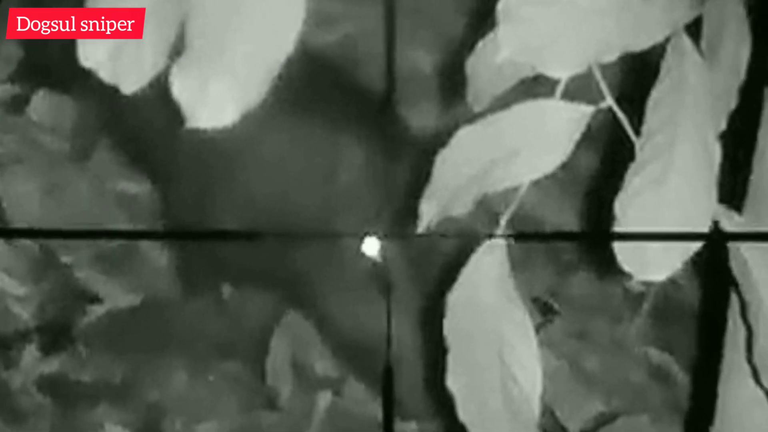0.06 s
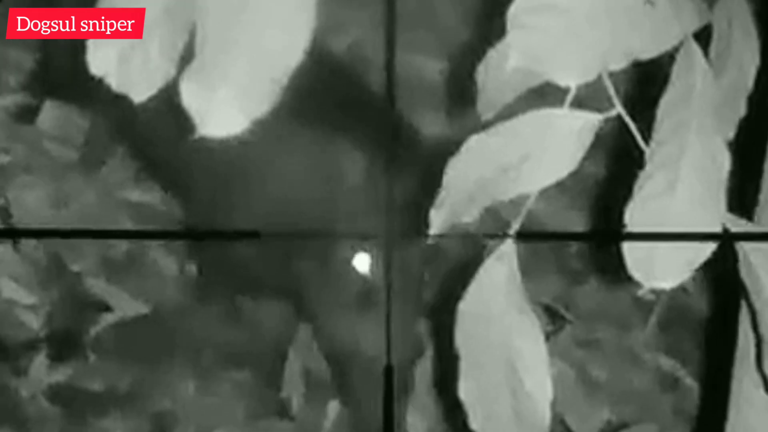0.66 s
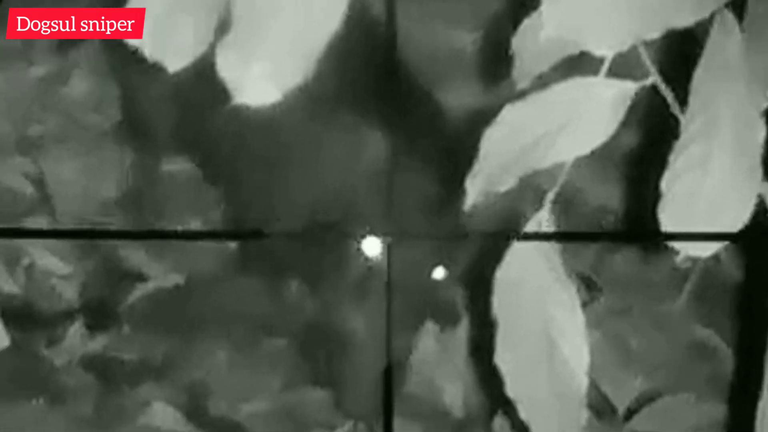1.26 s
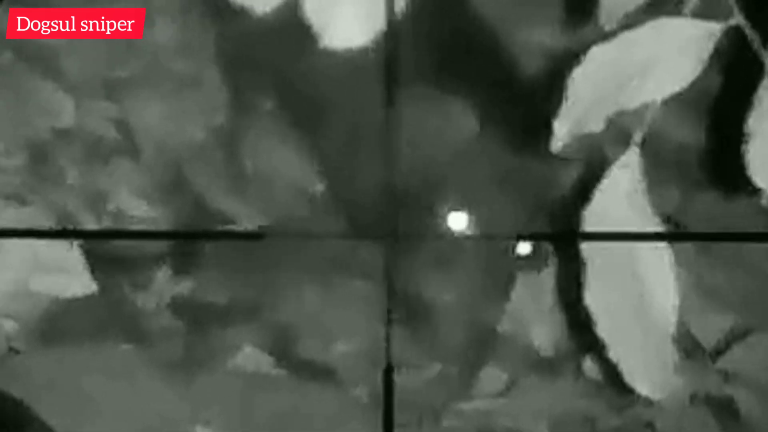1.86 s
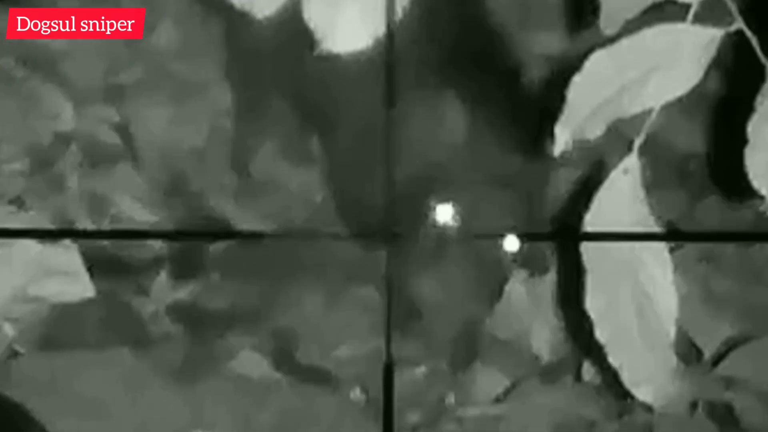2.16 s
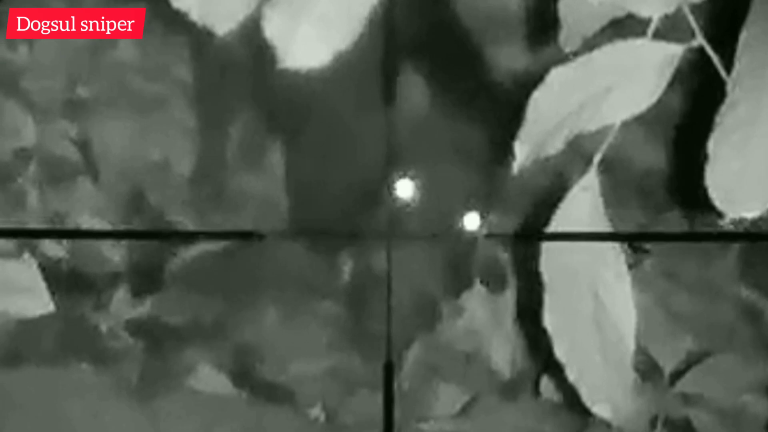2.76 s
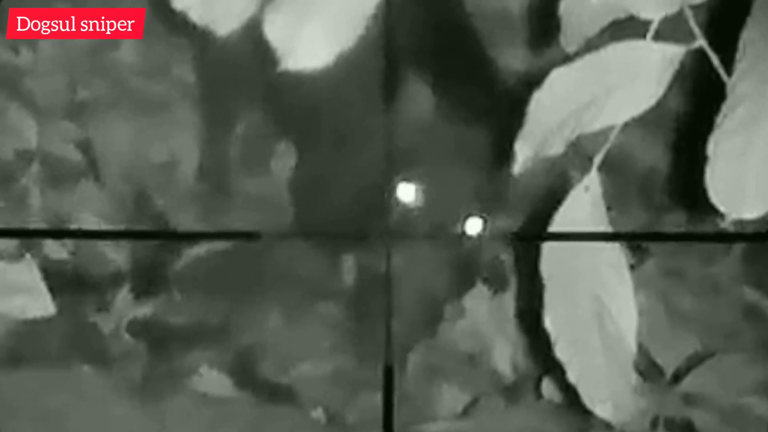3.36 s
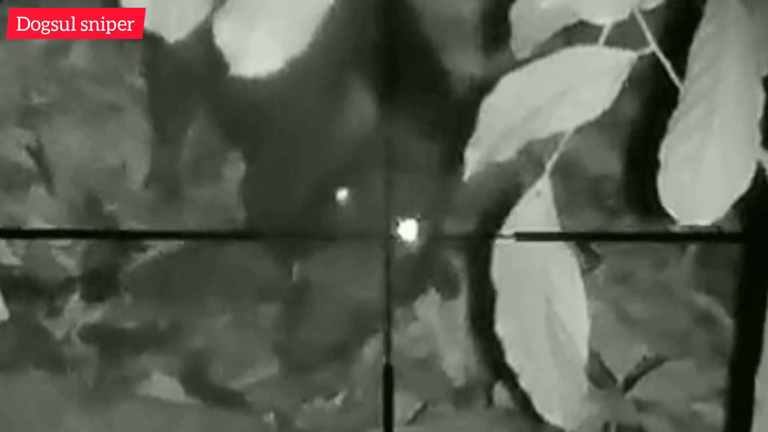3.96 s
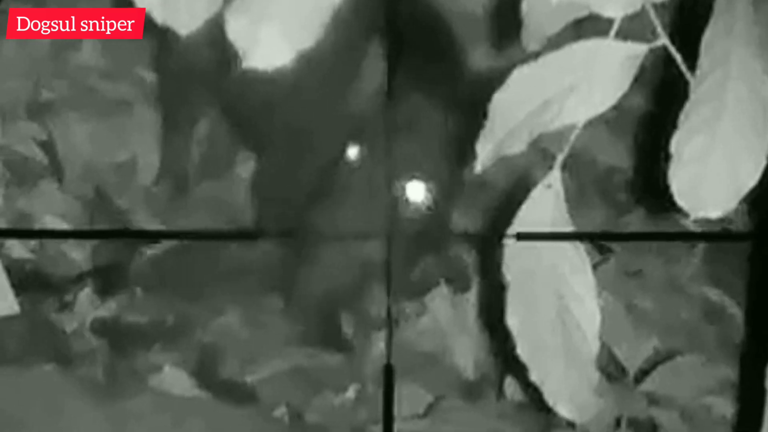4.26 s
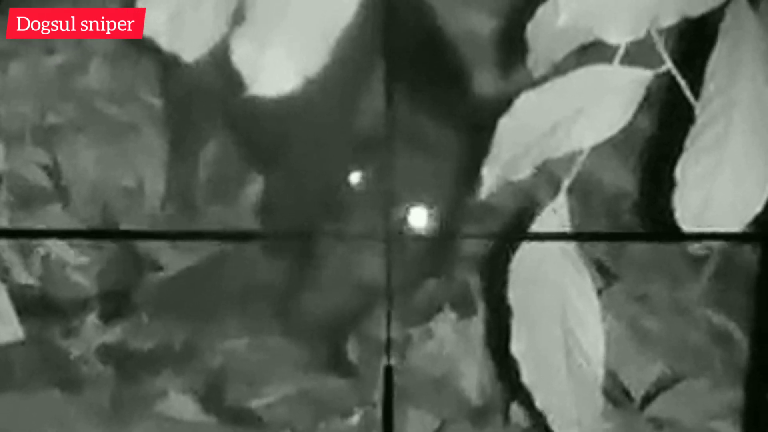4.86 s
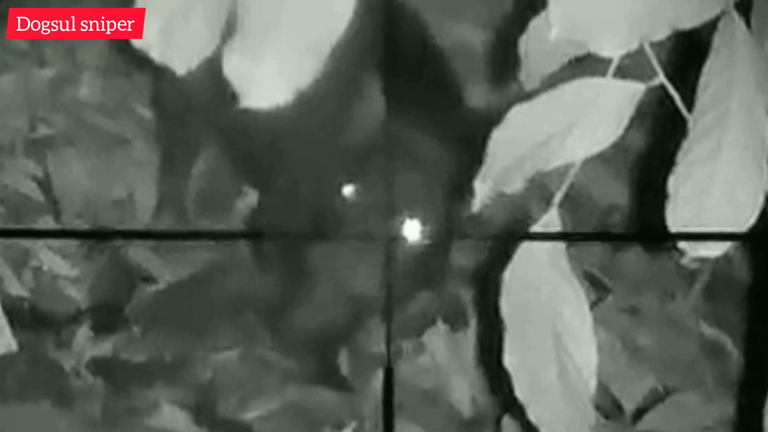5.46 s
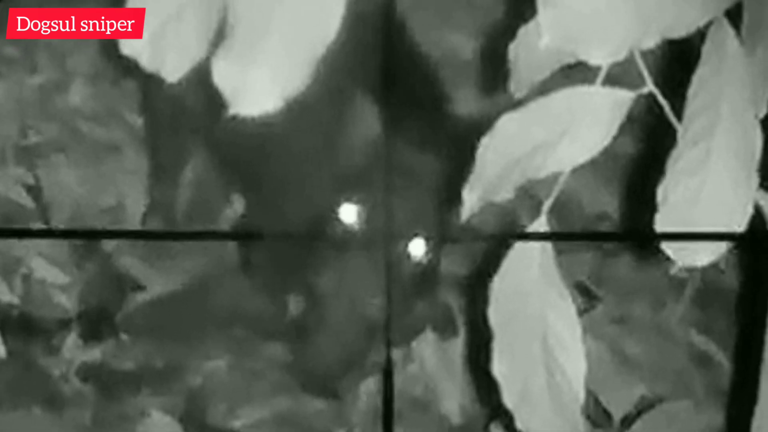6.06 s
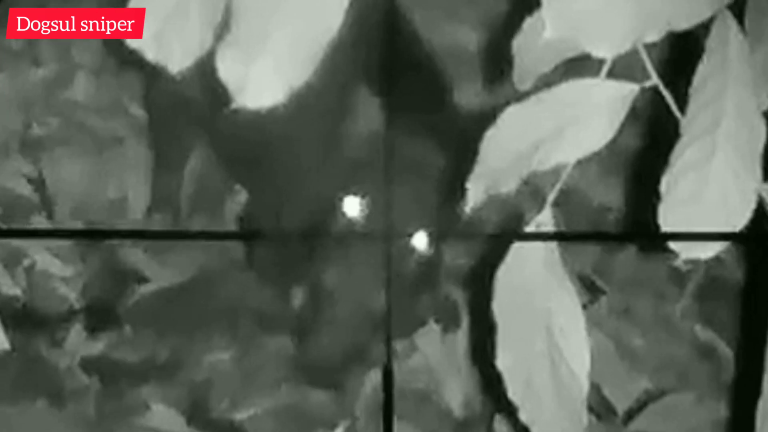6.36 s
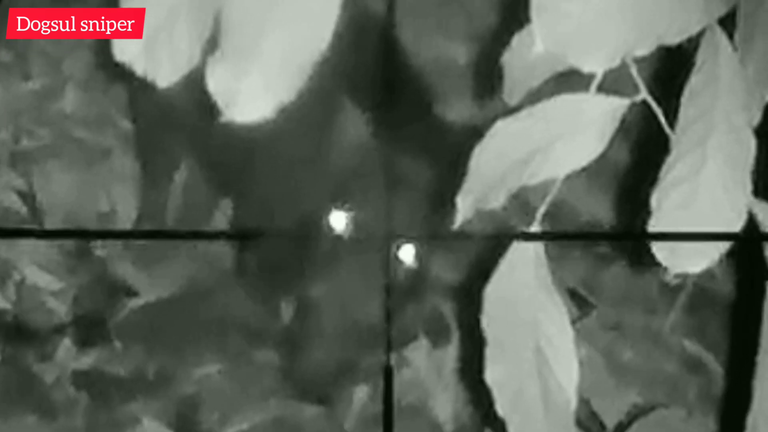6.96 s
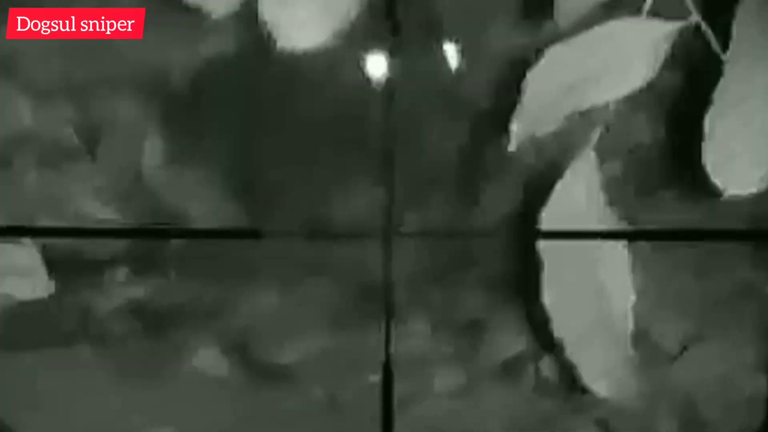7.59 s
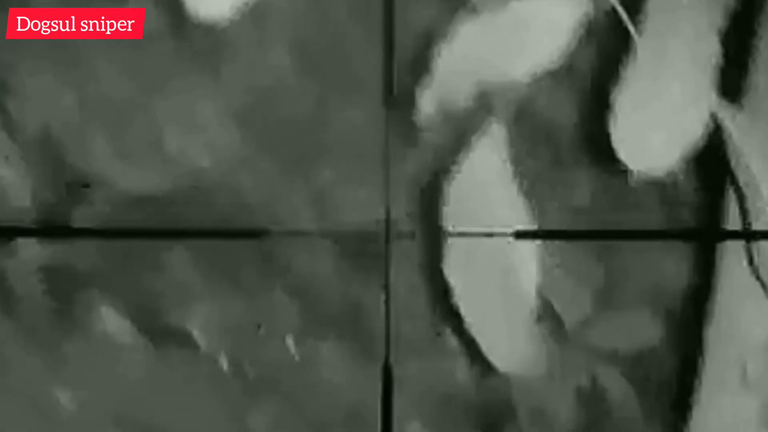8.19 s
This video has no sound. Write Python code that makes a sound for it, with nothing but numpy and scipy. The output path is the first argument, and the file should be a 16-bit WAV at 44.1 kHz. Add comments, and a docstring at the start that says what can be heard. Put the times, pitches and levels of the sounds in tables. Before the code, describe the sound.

Crickets chirp at night while hands bump a rifle stock, then one loud gunshot silences them and rolls away through the woods.

```python
"""A rifle fires once in the woods at night, with the microphone mounted on it.
Before the shot, hands shift and knock the stock as it is aimed. Close by, a cricket scrapes its wings,
chirping eight times a second; a purer one trills in surges behind it. Far off, insects hiss and buzz
and animals call faintly. The crickets stop at the shot; the report scatters through the nearby trees,
and a distant tree line sends it back as a long, dull roll."""
import sys
import numpy as np
from scipy import signal
from scipy.fft import irfft, next_fast_len
from scipy.io import wavfile
from scipy.ndimage import uniform_filter1d

SR = 44100
rng = np.random.default_rng(int(sys.argv[2]) if len(sys.argv) > 2 else 0)


def wav_out(sig):
    """Save sig, one row per channel (or a flat mono array), as 16-bit PCM at SR to the path in sys.argv[1]."""
    wavfile.write(sys.argv[1], SR, np.round(np.clip(np.atleast_2d(sig).T, -1, 1) * 32767).astype(np.int16))


N = 362943
T = np.arange(N) / SR
SHOT_S = 7.178
TRILL_DB = -49  # the trilling cricket's full effort


def undb(db):
    """Decibels to gain."""
    return 10 ** (np.asarray(db) / 20)


def arch(offset, half):
    """A rounded swell, 1 at offset 0 and silent beyond half."""
    return np.maximum(1 - (offset / half) ** 2, 0)


def walk(rate):
    """Smooth chance of spread near 1 that changes rate times a second."""
    knots = np.arange(0, T[-1] + 1, 1 / rate)
    return np.interp(T, knots, rng.standard_normal(len(knots)))


def nearest(times):
    """For each sample, the index of the nearest event and the ms since it."""
    index = np.searchsorted((times[1:] + times[:-1]) / 2, T)
    return index, (T - times[index]) * 1000


def noise(spectrum, width=0., narrowing=4.8, ripple_db=0.):
    """Noise of mid rms near 1, its colour rippled by crossing paths; width is treble side over mid."""
    hz, db = np.transpose(spectrum)
    size = next_fast_len(N, True)
    f = np.arange(size // 2 + 1) * SR / size
    knots = np.arange(0, SR, 35)
    ripple = np.interp(f, knots, rng.standard_normal(len(knots)))
    gain = undb(np.interp(np.log(f + 1), np.log(hz), db) + ripple_db * ripple)
    gain = gain / np.linalg.norm(gain) * size / 2
    draw = lambda g: irfft(g * rng.standard_normal(2 * len(f)).view(complex), size)[:N]
    mid = draw(gain)
    if not width:
        return mid
    side = draw(gain * np.minimum(f / 6550, 1) ** narrowing)  # the image narrows below 6550 Hz
    return mid + width * side * np.array([[1], [-1]])


def arrivals(rows):
    """Envelope of bursts that each swell and die away; their powers add."""
    power = 0
    for s, db, rise, t60 in rows:
        age = np.maximum(T - s, 0)
        decay = undb(db - 60 * np.maximum(age - rise, 0) / t60)
        power = power + (np.minimum(age / rise, 1) * decay) ** 2
    return np.sqrt(power)


def foliage(x, t60, wet_db):
    """Add the short scatter from leaves and trunks on the way to the microphone."""
    t = T[:SR // 2]
    tail = rng.standard_normal(len(t)) * undb(-60 * t / t60) * (t > .006)
    return x + undb(wet_db) * signal.fftconvolve(x, tail / np.linalg.norm(tail))[:N]


def night():
    """The bed of the woods: a low hush of air under the thin hiss and short buzzes of far insects."""
    # colours of the air, the insect chorus and a far bush cricket: (frequency [Hz], level [dB])
    hush_colour = [(20, -25), (45, -4), (90, 2), (170, -6.5), (300, -22), (600, -28.5), (1100, -35.5),
                   (1600, -40), (2500, -52.5)]
    chorus_colour = [(300, -13.5), (1300, -22.5), (2000, -15.5), (2700, -3), (4200, -7.5), (5200, -4),
                     (6200, -15), (8500, -8.5), (10500, -12), (12800, -17), (13500, -10.5), (14500, -32.5)]
    buzz_colour = [(3500, -33), (4600, -4), (5100, 9), (5700, -10), (7000, -36)]
    # slow swell of the night air: (time [s], level [dB])
    hush_swell = [(0, -77), (1.1, -81), (2.6, -77.5), (3.4, -75.5), (4.2, -76), (5.2, -74)]
    # buzzes of the bush cricket: (time [s], level [dB], half length [s])
    buzzes = [(0.447, -63, 0.16), (.8, -65, 0.1), (2.089, -71, 0.11), (2.415, -67, 0.088),
              (3.33, -72, 0.097), (3.675, -72, 0.16), (4.704, -69, 0.16), (5.3, -75, 0.088),
              (6.894, -65.5, 0.14)]
    hush = noise(hush_colour) * undb(np.interp(T, *np.transpose(hush_swell)) + 1.6 * walk(4.9))
    chorus = noise(chorus_colour, width=0.34, ripple_db=3.6) * undb(-76 + 2 * walk(24))
    buzzing = sum(undb(db) * arch(T - s, half) ** 2 for s, db, half in buzzes)
    return hush + chorus + noise(buzz_colour) * buzzing * undb(-4.5 + 2.5 * walk(90))


def trill_notes():
    """Notes as (time [s], level [dB]): each surge starts brisk, then slackens and softens."""
    # surges of the trill: (first note [s], slackens [s], last note [s], start below full [dB])
    surges = [(0.04, 0.605, 0.915, 0), (1.334, 2.074, 2.508, 7), (2.551, 3.196, 3.389, 2.5),
              (3.859, 4.636, 5.19, 7), (5.238, 5.896, 6.029, 3.5), (6.534, 7.137, 7.137, 5)]
    # hesitant notes between the surges: (time [s], level [dB])
    stray_notes = [(0.998, -64.5), (3.459, -64), (3.59, -66.5), (3.72, -65), (3.799, -57), (6.152, -65.5),
                   (6.277, -69), (6.407, -68), (6.478, -55.5)]
    brisk_per_s, slack_per_s = 23.1, 16
    swell_s, slacken_s, slack_db = 0.12, 0.1, -4
    notes = list(stray_notes)
    for first, slackens, last, soft_db in surges:
        brisk = np.linspace(first, slackens, round((slackens - first) * brisk_per_s), endpoint=False)
        slack = np.linspace(slackens, last, round(abs(last - slackens) * slack_per_s) + 1)
        notes += [(s, TRILL_DB - soft_db * np.exp((first - s) / swell_s)) for s in brisk]
        notes += [(s, TRILL_DB + slack_db * (1 - np.exp((slackens - s) / slacken_s))) for s in slack]
    return sorted(map(tuple, notes))


def trilling_cricket():
    """Farther back in the foliage: pure notes that sag ever faster in pitch as the wing slows."""
    top_hz, sag_hz, sag_ms, half_ms = 3784, 162.5, 10, 15.9
    scrape_hz, scrape_hz_per_ms, scrape_lead_ms = 2700, 48, 13
    times, level_db = np.transpose(trill_notes())
    index, ms = nearest(times)
    detune, force, haste = rng.standard_normal((len(times), 3))[index].T
    effort_db = level_db[index]
    ms = np.clip(ms * (1 + .08 * haste), -2 * half_ms, half_ms)
    # a weak stroke is slower and so a little lower
    speed = 1 + 0.004 * (effort_db - TRILL_DB) + 0.0069 * detune + 0.0039 * walk(300)
    sing = lambda hz: np.sqrt(2) * np.sin(2 * np.pi * np.cumsum(hz * speed) / SR)
    note = sing(top_hz - sag_hz * np.exp(ms / sag_ms)) * arch(ms, half_ms) ** 1.56
    # a faint rising scrape leads into each note
    scrape_ms = ms + scrape_lead_ms
    scrape = sing(scrape_hz + scrape_hz_per_ms * scrape_ms) * arch(scrape_ms, half=13)
    tone = (note + undb(-27) * scrape) * undb(effort_db - 2 + 0.69 * force)
    trunk_echo = undb(-25) * np.interp(T - .019, T, tone)
    return foliage(tone + trunk_echo, t60=0.29, wet_db=-17.5)


def near_cricket():
    """Close to the microphone, a scraper runs over a wing's file: a bright gliding tone in a dry rasp."""
    # bouts of evenly spaced chirps: (first chirp [s], last chirp [s], chirps [count], level [dB])
    bouts = [(0.066, 1.073, 10, -44), (1.19, 2.086, 9, -44.3), (2.228, 2.683, 5, -44),
             (2.8, 3.269, 5, -43.7), (3.418, 3.771, 4, -44), (3.909, 4.033, 2, -43.8),
             (4.189, 4.539, 4, -43.3), (4.667, 5.135, 5, -43.5), (5.258, 5.508, 3, -44),
             (5.626, 6.453, 8, -43.7), (6.601, 6.601, 1, -44), (6.712, 7.071, 4, -59)]
    # the opening and closing wing strokes, timed from the chirp's peak:
    # (time [ms], half length [ms], level [dB], slowest tooth rate [Hz], slowest at [ms])
    strokes = [(-14.5, 6, -9, 2560, -21), (0.5, 9.2, 1.5, 2750, -2)]
    # colour of the rasp: (frequency [Hz], level [dB])
    rasp_colour = [(500, -30.5), (1000, -34), (1800, -28.5), (2400, -12.5), (3000, -3), (4200, -6.5),
                   (5500, -0.5), (6600, 1.5), (7500, -3), (8800, 3.5), (9900, -10.5), (12000, -17.5),
                   (14200, -21.5), (15000, -53)]
    speed_up_hz, speed_up_ms = 299.2, 5.5  # the scraper runs faster either side of its slowest moment
    chirps = [(s, db) for first, last, count, db in bouts for s in np.linspace(first, last, round(count))]
    times, level_db = np.transpose(chirps)
    index, ms = nearest(times)
    haste, detune, brightness, force = rng.standard_normal((len(times), 4))[index].T
    ms = ms * (1 + 0.064 * haste)
    gains = [undb(db) * arch(ms - at, half) for at, half, db, _, _ in strokes]
    rates = [low + speed_up_hz * np.tanh(abs(ms - slowest) / speed_up_ms) for *_, low, slowest in strokes]
    gain = sum(gains)
    tooth_hz = np.where(gains[0] > gains[1], *rates)
    # the teeth catch unevenly, which frays the upper harmonics most
    speed = 1 + 0.0098 * detune + .012 * walk(200) + 0.02636 * walk(1400)
    phase = 2 * np.pi * np.cumsum(tooth_hz * speed) / SR
    wing = undb(-4.5) * np.sin(phase) + undb(-10) * np.sin(2 * phase)
    wing += undb(1.5 + 1.25 * brightness) * np.sin(3 * phase)
    tone = foliage(np.sqrt(2) * wing * gain * undb(-2.5 + 2.44 * walk(700)), t60=0.039, wet_db=-17)
    # the rasp follows the strokes and trails off on both sides
    scraping = np.hypot(gain, undb(-1.5 - 0.75 * abs(ms)))
    rasp = noise(rasp_colour, width=0.27, ripple_db=3) * scraping
    rasp *= undb(-6.5 + 2.86 * walk(500) + 2 * walk(70))
    return (tone + rasp) * undb(level_db[index] + 0.57 * force)


def far_animals():
    """Single plain notes with an octave above, blurred by the woods they cross."""
    # distant calls: (time [s], level [dB], half length [s], pitch [Hz], octave level [dB])
    hoots = [(.3, -95.5, 0.26, 478, -3), (.8, -99, 0.3, 440, 3), (1.685, -93, 0.27, 521, 2),
             (2.408, -94, 0.087, 433, 6), (6.766, -64, 0.033, 2830, -38)]
    calls = 0
    for s, db, half, hz, octave_db in hoots:
        phase = 2 * np.pi * np.cumsum(hz + 38 * walk(160)) / SR
        voice = np.sin(phase) + undb(octave_db) * np.sin(2 * phase)
        calls = calls + undb(db) * arch(T - s, half) * voice
    return foliage(calls * undb(-2), t60=0.44, wet_db=5)


def handling():
    """Hands rub and bump the stock, which booms straight into the microphone; a sleeve rustles faintly."""
    # rubs of the hands, the first row a faint low note from far off: (time [s], level [dB], half length [s])
    rubs = [(3.403, -71, 0.049), (5.424, -48, 0.2), (5.744, -46.5, 0.18), (5.987, -54, 0.18),
            (6.452, -52.5, 0.16), (6.74, -44, 0.22), (7.016, -52, 0.083), (7.497, -59.5, 0.5),
            (8.208, -68, .06)]
    # knocks on the stock: (time [s], level [dB], brightness [dB], half length [s])
    knocks = [(5.289, -46, -6, 0.032), (5.373, -41.5, -17, 0.068), (5.606, -40.5, -21, 0.014),
              (5.67, -43.5, -12, 0.037), (5.713, -33, -14, 0.011), (5.791, -37, -31, 0.021),
              (5.824, -37, -12, 0.015), (6.33, -37.5, -1, 0.02), (6.505, -43.5, -26, 0.011),
              (6.622, -30, 0, 0.025), (6.657, -34.5, 7.5, 0.01), (6.724, -31, -15, 0.012),
              (6.813, -33, 6, 0.023)]
    # small clicks of rifle and sling: (time [s], level [dB], rise [s], t60 [s])
    clicks = [(4.9, -67, .001, 0.063), (5.255, -65, 0.0042, 0.17), (6.325, -77, .003, 0.12)]
    # colours of the stock's boom, a tap on it and the sleeve: (frequency [Hz], level [dB])
    stock_colour = [(20, -25), (45, -11), (80, 5), (115, -2), (160, -4), (220, -19.5), (320, -36),
                    (500, -67.5), (1500, -81)]
    tap_colour = [(60, -13), (170, 4), (260, 3.5), (400, -11), (560, -27.5), (750, -51), (2500, -78)]
    sleeve_colour = [(200, 3.5), (600, -1.5), (1500, -3.5), (3000, -0.5), (8000, -14), (14000, -28)]
    boom_power = sum((undb(db) * arch(T - s, half)) ** 2 for s, db, half in rubs)
    tap_power = 0
    for s, db, bright_db, half in knocks:
        push = (undb(db) * arch(T - s - half / 4, half)) ** 2
        boom_power += push
        tap_power += push * undb(bright_db) ** 2
    body = noise(stock_colour)
    # the stock swings about as widely as it is pushed
    body = body / np.sqrt(uniform_filter1d(body ** 2, SR // 30) + 0.1)
    rustle = undb(-78.5 + 1.3 * walk(7.4)) * (T > 5.25) + arrivals(clicks)
    taps = undb(-12.5) * noise(tap_colour) * np.sqrt(tap_power)
    return body * np.sqrt(boom_power) + taps + noise(sleeve_colour) * rustle


def through_air(x, loss_db):
    """Air takes loss_db per kHz for each second that the report has travelled."""
    hz, s, frames = signal.stft(x, SR, nperseg=256)
    absorption = undb(-loss_db * np.outer(hz / 1000, np.maximum(s - SHOT_S, 0)))
    return signal.istft(frames * absorption, SR)[1][..., :N]


def gunshot():
    """A sharp crack at the microphone, grainy scatter from nearby trunks, then the far tree line's roll."""
    # blast waves: (time [s], level [dB], rise [s], t60 [s])
    crack_waves = [(7.139, -32, 0.022, 0.11), (7.165, -17, 0.0098, 0.08), (7.1784, -6, 0.00021, 0.047),
                   (7.1845, -18, 0.0014, 0.06), (7.192, -20, 0.0011, 0.021)]  # a short swell, the report and its first reflections
    trunk_waves = [(7.188, -24, 0.0084, 1), (7.255, -22, 0.03, 0.42), (7.3125, -22, 0.00036, 0.0085)]
    roll_waves = [(7.417, -28.5, 0.021, 1.24), (7.5, -47, 0.11, 6.8)]
    # their colours: (frequency [Hz], level [dB])
    crack_colour = [(30, -16.5), (150, -18), (300, -2.5), (700, -1.5), (1400, -5.5), (2500, -3),
                    (3600, 3.5), (5000, -8), (7500, -11), (11000, -12.5), (12800, -21.5), (14000, -14),
                    (15200, -5), (16000, -13.5)]
    trunk_colour = [(30, -22), (90, -3.5), (250, -6), (500, -3.5), (1400, -6), (2600, 1), (4500, -4),
                    (6500, -2.5), (8500, -9.5), (11000, -12.5), (13000, -24), (15200, -10), (16000, -20.5)]
    roll_colour = [(40, -26), (180, -18), (350, 0.5), (550, -5.5), (900, -2), (1400, -4.5), (2000, -3.5),
                   (2700, 1), (3700, -8), (6500, -12), (9000, -16), (12000, -43), (16000, -54)]
    lean_right = undb([[-.6], [.6]])
    crack = noise(crack_colour, width=0.69, narrowing=.6) * arrivals(crack_waves) * lean_right
    trunks = noise(trunk_colour, width=0.0092, ripple_db=2.5) * arrivals(trunk_waves)
    trunks *= undb(1.2 * walk(350) + 0.53 * walk(90))
    roll = noise(roll_colour, ripple_db=3) * arrivals(roll_waves) * undb(1.08 * walk(120))
    return crack + through_air(trunks, loss_db=3) + through_air(roll, loss_db=2.5)


def scene():
    """The woods as heard from the rifle; at the shot both crickets fall silent and the bed drops."""
    before_shot = T < SHOT_S
    crickets = (near_cricket() + trilling_cricket()) * before_shot
    distance = far_animals() + night() * np.where(before_shot, 1, undb(-11.5))
    return crickets + distance + handling() + gunshot()


def record(dry):
    """The recorder rounds the peak of the shot and cuts the top above 15.8 kHz."""
    rounded = .8 * np.tanh(dry / .8)
    return signal.sosfilt(signal.ellip(10, .2, 80, 15800, fs=SR, output="sos"), rounded)


dry = scene()
out = record(dry)
wav_out(out)
```